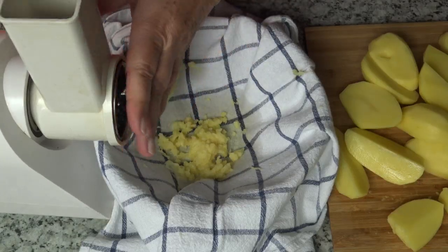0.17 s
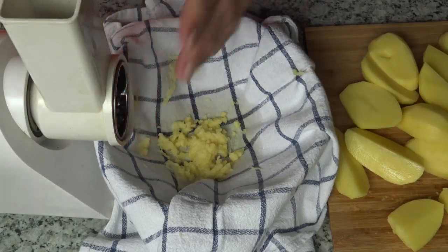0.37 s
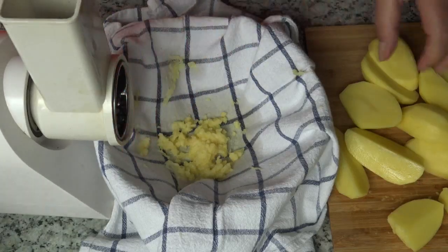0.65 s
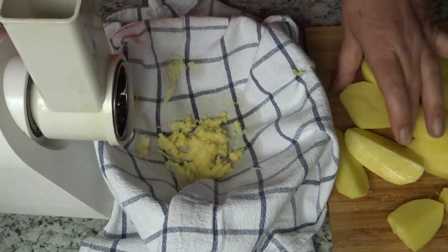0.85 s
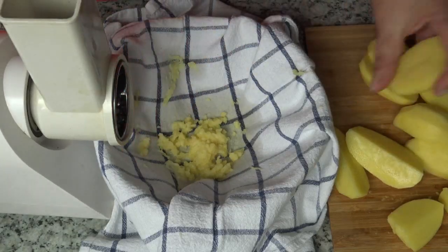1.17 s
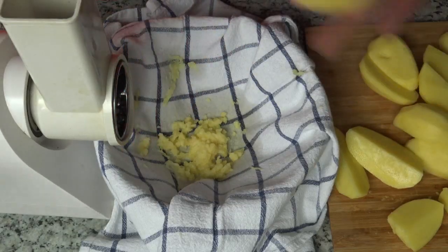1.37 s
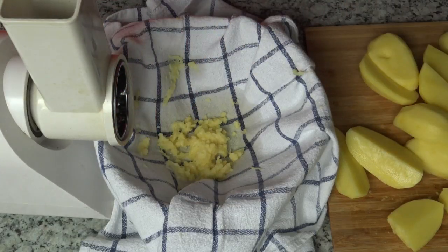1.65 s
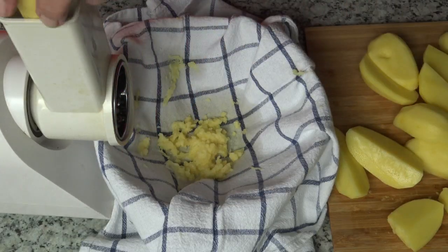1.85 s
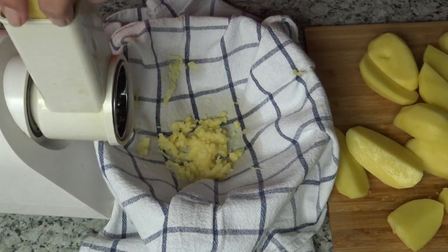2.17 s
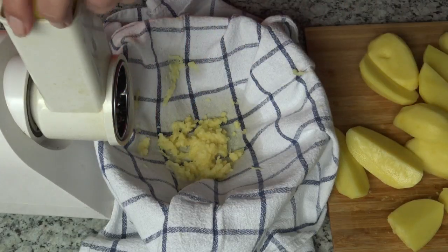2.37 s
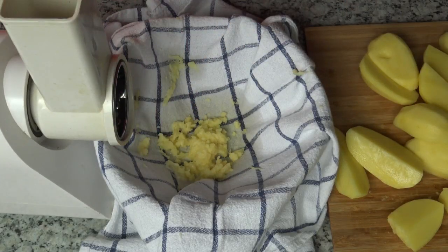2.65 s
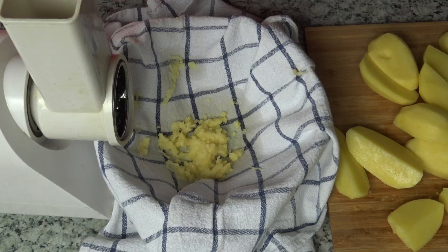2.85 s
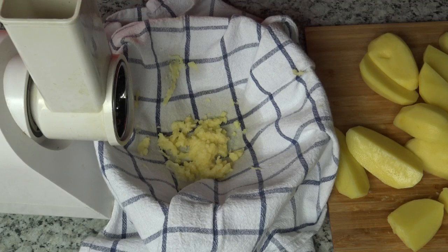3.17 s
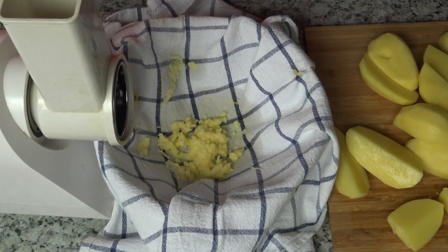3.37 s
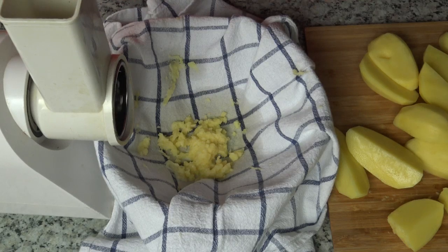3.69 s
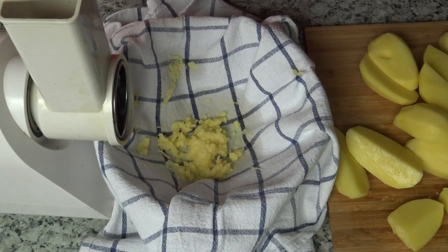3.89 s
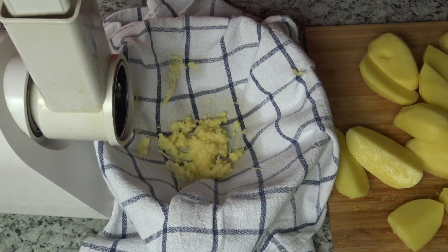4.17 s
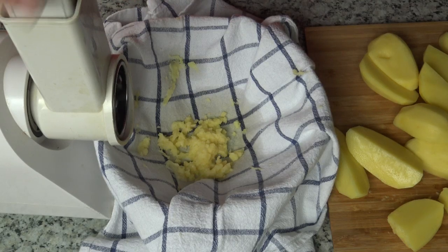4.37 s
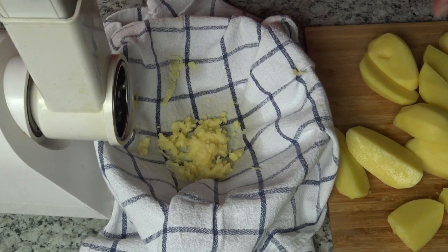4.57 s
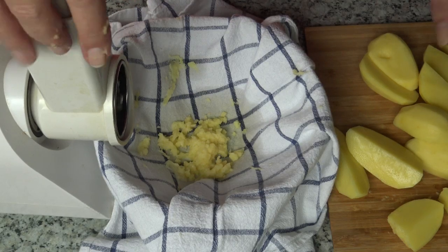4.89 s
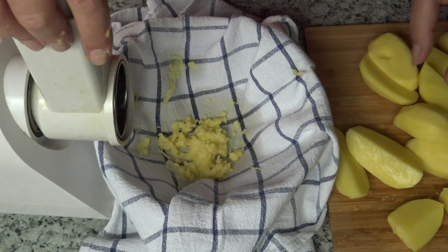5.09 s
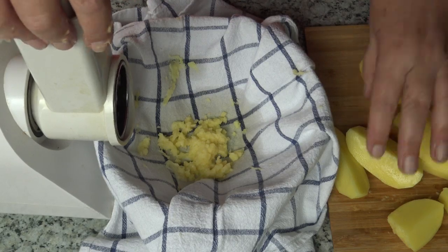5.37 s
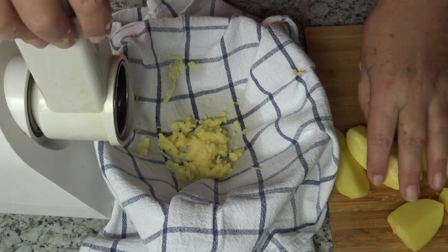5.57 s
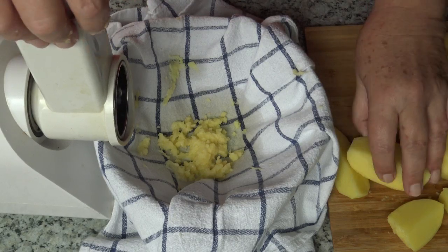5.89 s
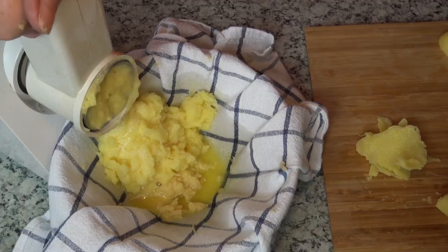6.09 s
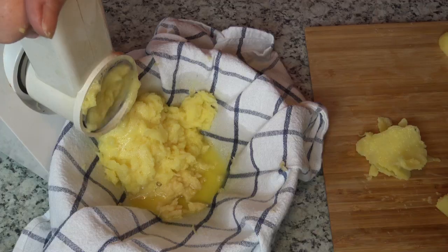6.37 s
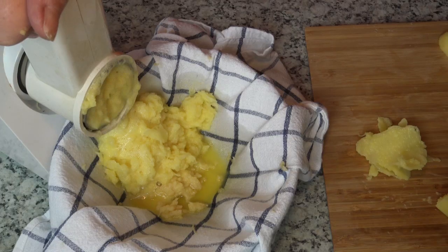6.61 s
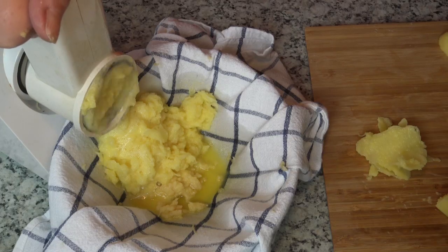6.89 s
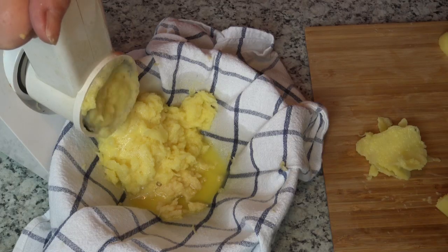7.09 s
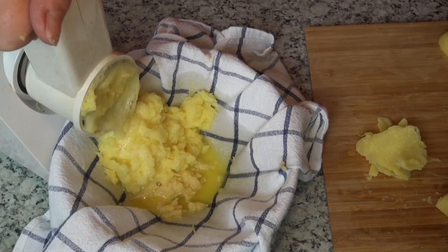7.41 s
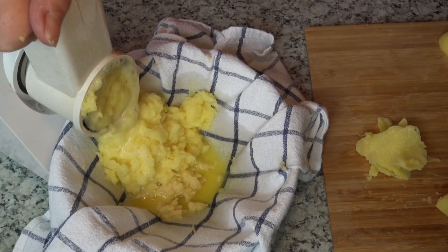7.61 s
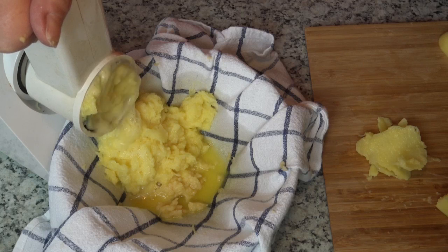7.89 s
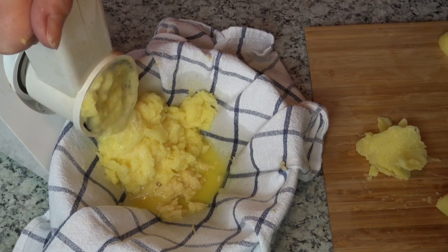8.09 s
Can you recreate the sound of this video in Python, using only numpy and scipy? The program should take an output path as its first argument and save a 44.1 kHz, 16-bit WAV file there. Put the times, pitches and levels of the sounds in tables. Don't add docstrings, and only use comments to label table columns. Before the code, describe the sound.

Handling sounds come first: skin hiss, plastic chatter, sharp knocks on wood and one heavy hollow thud, over faint room hum. Then a crisp switch click starts a loud kitchen motor close to the microphone. It climbs within a second to a buzzing gear whine, squeaks once, rattles and grates steadily, then jumps to a later, faster stretch with slices throbbing in the chute.

```python
import sys
import numpy as np
from scipy import signal
from scipy.fft import rfft, irfft
from scipy.io import wavfile
from scipy.ndimage import uniform_filter1d, map_coordinates

SR = 44100
rng = np.random.default_rng(int(sys.argv[2]) if len(sys.argv) > 2 else 0)


def bounce(signal):
    frames = np.transpose(np.atleast_2d(signal))
    limited = np.clip(frames, -1, 1)
    pcm = np.round(limited * 32767).astype(np.int16)
    wavfile.write(sys.argv[1], SR, pcm)


def voltage_ratio(level):
    return 10 ** (np.asarray(level, float) / 20)


N = 363825
TIME = np.arange(N) / SR
START_S, CUT_S = 3.208, 6.006


def unit(x):
    return x / np.sqrt(np.mean(x ** 2) + 1e-20)


def along(points, hz):
    point_hz, value = np.transpose(points)
    return np.interp(np.log(hz + 1), np.log(point_hz + 1), value)


def curves(rows):
    s, *columns = np.transpose(rows)
    return [np.interp(TIME, s, column) for column in columns]


def wobble(rate):
    coarse = TIME[::32]
    knots = rng.standard_normal(int(N * rate / SR) + 4)
    return np.interp(TIME, coarse, map_coordinates(knots, [coarse * rate]))


def rush(spectrum, patchy_db):
    # pitch_hz, correlation
    likeness = [(60, 0.91), (1400, 0.98), (3000, 0.94), (7000, 0.83), (12000, 0.93)]
    z = signal.stft(rng.standard_normal((2, N + 512)), nperseg=512)[2]
    field = uniform_filter1d(rng.standard_normal(z.shape[1:]), size=4, axis=0)
    field = uniform_filter1d(field, size=10, axis=1)
    pair = signal.istft(z * voltage_ratio(patchy_db * unit(field)), nperseg=512)[1][:, :N]
    hz = np.fft.rfftfreq(N, 1 / SR)
    width = np.arccos(np.clip(along(likeness, hz), -1, 1)) / 2
    mid, side = irfft(rfft(pair) * voltage_ratio(along(spectrum, hz)) * [np.cos(width), np.sin(width)], N)
    return unit(np.array([mid + side, mid - side]))


def sides(x, pan_db):
    lean = np.tanh(np.asarray(pan_db) * np.log(10) / 40)
    return np.array([x * (1 + lean), x * (1 - lean)])


def puff(low_hz, high_hz, t60, rise=0.00052):
    t = np.arange(SR // 4) / SR
    band = signal.butter(N=3, Wn=[low_hz, min(high_hz, SR / 2.1)], btype="band", fs=SR, output="sos")
    noise = unit(signal.sosfilt(band, rng.standard_normal(2 * len(t))))[len(t):]
    return noise * voltage_ratio(-60 * t / t60) * (1 - np.exp(-(t / rise) ** 2))


def room_tone():
    # pitch_hz, level_db per Hz
    spectrum = [(15, -43.5), (25, -16), (53, -2.5), (72, -22.5), (100, 2), (150, -10), (300, -17.5),
                (450, -17), (700, -22), (1500, -23.5), (4000, -32), (15700, -37.5)]
    return voltage_ratio(-51) * rush(spectrum, patchy_db=-0.9)


def kitchen(x):
    # pitch_hz, t60_s
    decay = [(150, 0.45), (1000, 0.27), (4000, 0.29), (12000, 0.13)]
    out, step = np.zeros((2, N + SR)), SR // 4
    for start in range(0, N, step):
        hz, t, z = signal.stft(rng.standard_normal((2, SR // 2)), SR, nperseg=256)
        tail = signal.istft(z * voltage_ratio(-60 * t / along(decay, hz)[:, None]), SR, nperseg=256)[1]
        tail = tail[0] + 0.23 * np.array([tail[1], -tail[1]])
        wet = signal.fftconvolve(x[None, start:start + step], tail / np.linalg.norm(tail[0]), axes=1)
        out[:, start + 200:start + 200 + wet.shape[1]] += wet
    return out[:, :N]


def bumps():
    # start_s, level_db
    jolts = [
        (.03, -39),
        (1.17, -39),
        (1.95, -32.5),
        (4.43, -35),
        (5.95, -33),
        (7.82, -34),
    ]
    out = np.zeros(N + SR)
    for s, db in jolts:
        out[round(s * SR):][:SR // 4] += voltage_ratio(db) * puff(35, 119, 0.27, rise=0.0098)
    return out[:N]


def strokes(column, drop_db_per_s, rest_db):
    # peak_s, build_up_s, hiss_db, body_db
    moves = [(.02, 0.077, -29.5, -28), (0.07, 0.068, -30, -40), (.33, .1, -43.5, -43.5),
             (.6, 0.054, -45, -47), (.8, 0.06, -54, -39.5), (.87, 0.068, -66, -38), (.9, .02, -47.5, -42.5),
             (1.14, 0.0028, -31, -33.5), (1.23, 0.067, -45, -55), (1.59, 0.065, -47.5, -58),
             (1.75, 0.041, -40, -49), (1.96, .12, -50, -47.5), (2.15, 0.14, -65, -45),
             (2.35, .15, -64, -53), (2.5, 0.092, -63, -54), (2.64, .1, -50, -75), (3.2, 0.089, -48, -54)]
    levels = []
    for row in moves:
        before = 11.5 * (row[0] - TIME) / abs(row[1])
        after = drop_db_per_s * (TIME - row[0])
        levels.append(row[column] - np.where(TIME < row[0], before, after))
    return np.maximum(np.max(levels, axis=0), rest_db)


def rustle():
    # pitch_hz, level_db per Hz
    skin = [(1470, -44), (2500, -6), (3220, -0.5), (3590, -1.5), (4250, 0.5), (7160, -3), (10200, -7),
            (15700, -19.5)]
    hiss_db = strokes(2, drop_db_per_s=235, rest_db=-72)
    body_db = strokes(3, drop_db_per_s=150, rest_db=-72)
    body = rush([(350, -40), (650, -3), (1000, -6), (1500, 0), (1800, -5), (2500, -13), (3600, -30)],
                patchy_db=3.5)
    hiss = voltage_ratio(hiss_db - 7.0 + 2.2 * wobble(60)) * rush(skin, patchy_db=2.0)
    return (TIME < START_S) * (hiss + voltage_ratio(body_db - 6.0) * body)


def taps(events, rise, t60):
    out, t = np.zeros(N + SR), np.arange(SR // 4) / SR
    swell = 1 - np.exp(-(t / rise) ** 2)
    for s, db, hz, thud_db, click_db in events:
        tone = np.sin(2 * np.pi * hz * t) * voltage_ratio(-60 * t / t60) * swell
        ring = 0.96 * tone + 0.59 * puff(hz / 1.21, hz * 1.147, t60, rise)
        low = np.sin(2 * np.pi * 270 * t) * voltage_ratio(-42 * t / t60) * swell
        thud = voltage_ratio(thud_db) * (0.67 * puff(165, 336, 1.7 * t60, rise + 0.0017) + 1.02 * low)
        scrape = 0.32 * puff(470, 2700, 1.14 * t60, rise)
        click = voltage_ratio(click_db) * puff(2400, 8750, 0.88 * t60, rise)
        out[round(s * SR):][:len(t)] += voltage_ratio(db) * (ring + thud + scrape + click)
    return out[:N]


def chute_handling():
    # start_s, level_db (peak), pitch_hz (ring), thud_db, click_db
    rubs = [(.102, -29, 720, 8, -20), (.29, -39, 695, -25, -9), (.335, -43, 1790, -14, -8),
            (.582, -40.5, 1860, -34, 3.5), (1.945, -36, 840, 11, -8), (1.99, -43, 870, 3, -9),
            (2.03, -49, 1400, 8, -20), (1.718, -39, 636, -20, -14), (2.14, -41, 900, -3, -18),
            (2.145, -44, 2570, -20, -20)]
    # a fingernail catches on ridges, the board is touched at 0.893 s, the potato lands at 2.497 s
    scuffs = [(.024, -27, 4400, -30, -10), (.036, -24.5, 4500, -30, 0), (.04, -25.5, 1600, -30, -4),
              (.047, -24, 9900, -30, -4), (.062, -23, 10560, -30, -10), (.067, -31, 14000, -30, -7),
              (.07, -22, 4400, -30, -8), (.0765, -24.5, 11000, -30, 1.5), (.078, -30, 14500, -30, -3),
              (.095, -35, 6260, -30, -6), (.893, -44, 2800, -30, -8), (1.338, -46, 2100, -20, 2),
              (2.689, -45, 9500, -30, -2), (2.497, -17.5, 9500, -30, -10), (2.498, -25, 7800, -30, -10)]
    chatter = [(1.8437, -30, 1590, -11, -14), (1.8627, -33, 1300, -12, -10), (1.872, -36, 1500, -14, -10),
               (1.9176, -43, 1590, -14, -15), (1.952, -33, 1000, 9, -5), (2.0967, -36, 1450, -3, -17),
               (2.135, -38, 1510, -6, -14), (2.15, -42, 1510, -12, -16), (2.165, -44, 1500, -6, -18),
               (2.222, -40, 1400, -14, -8), (2.2314, -34, 1360, -9, -10), (2.2393, -34, 1500, -11, -9),
               (2.3366, -45, 1550, -8, -8), (2.3491, -41, 1280, -10, -7), (2.3655, -34, 1480, -10, -14),
               (2.3705, -34, 1500, -10, -13), (2.38, -33, 1550, -2, -11), (2.3895, -32, 1400, -3, -15),
               (2.4, -38, 1490, 2, -14), (2.4269, -42, 1460, -8, -18), (2.4514, -24, 1490, -22, -28),
               (2.4598, -23, 1580, -24, -22), (2.468, -29, 1560, -12, -21), (2.476, -31, 990, 5, -25)]
    small_taps = [(0.0, -26.5, 400, 2.5, -14), (.004, -34, 1400, -7, -11), (0.535, -41, 1970, -13, -13),
                  (0.72, -43, 1990, -15, -7), (1.1355, -29.5, 1255, -13, 0), (1.575, -34.5, 2080, -24, -7),
                  (1.668, -49, 566, -12, -3), (1.71, -34.5, 630, -28, -2.5), (2.516, -24, 3450, 7.5, -16),
                  (2.693, -36.5, 700, 8, -18)]
    cracks = [(0.06, -16.5, 1345, -15, -15), (.063, -18.5, 690, -5, -22), (.0975, -23.5, 1870, -11, -21),
              (.104, -20.5, 332, 3, -26), (.897, -12.5, 890, -8, -31), (1.711, -31, 1830, -30, -20),
              (1.938, -30.5, 1600, 0, -8), (2.047, -35.5, 1490, 4.5, -20), (2.126, -36, 1500, -6, -17),
              (2.546, -21, 1740, 3, -13), (2.56, -26, 950, -6, -9), (2.5756, -21.5, 985, -10, -13),
              (2.577, -24, 1790, -20, -12)]
    rattle = [(4.408, -15, 810, -5, -15), (4.413, -14.5, 1300, -8, -19), (4.416, -19, 1700, -14, -16.5),
              (4.445, -20, 1260, -10, -16), (4.429, -16.5, 1270, -3, -16), (4.487, -11.5, 1240, -0.5, -17),
              (4.492, -17, 860, -10, -17.5), (4.509, -19, 1410, -6, -15), (4.511, -15.5, 1740, -13, -8),
              (4.516, -18, 800, -12, -17), (4.685, -15, 2110, -12, -6)]
    soft = taps(rubs, rise=0.004, t60=0.08) + taps(scuffs, rise=0.0017, t60=0.029)
    soft += taps(chatter, rise=0.0015, t60=0.042) + taps(small_taps, rise=0.001, t60=0.066)
    return soft + taps(list(cracks) + list(rattle), rise=0.00044, t60=0.034)


def switch():
    # start_s, level_db (peak), pitch_hz (ring), thud_db, click_db
    snaps = [
        (3.207, -17, 2680, -34, -10),
        (3.215, -12.5, 2525, -22, 2.5),
        (3.222, -17, 830, -8, -16),
    ]
    return taps(snaps, rise=0.001, t60=0.066)


def blows(events, modes, click_t60, rise):
    out, t = np.zeros(N + SR), np.arange(SR // 4) / SR
    swell = 1 - np.exp(-(t / rise) ** 2)
    for s, db, click_db, dull_db in events:
        ring = 0
        for hz, level_db, t60 in modes:
            decay_db = 60 * (t / t60) ** 1.49
            ring = ring + voltage_ratio(level_db + rng.normal(0, 1) - decay_db) * np.sin(2 * np.pi * hz * t)
        click = voltage_ratio(click_db) * puff(2200, 16000, click_t60, rise=0.00057)
        dull = voltage_ratio(dull_db) * puff(443, 1450, 0.31)
        out[round(s * SR):][:len(t)] += voltage_ratio(db) * (ring * swell + click + dull)
    return out[:N]


def board_knocks():
    # start_s, level_db (peak), click_db, dull_db
    knocks = [
        (.751, -31.5, -35, 5.5),
        (.7575, -6, -29.5, -9),
        (.8955, -15.5, -40, -13),
    ]
    # pitch_hz, level_db, t60_s
    wood = [(130, -18, .2), (190, -18, .15), (310, -18, .12), (556, -16, .1), (684, 0, .14),
            (750, -11, .12), (937, -10, .07), (1200, -15, .12), (1390, -9, .08), (1507, -4, .065),
            (1540, -21, .2), (1900, -25, .04)]
    return blows(knocks, wood, click_t60=0.017, rise=0.002)


def potato_drop():
    # start_s, level_db (peak), click_db, dull_db
    fall = [
        (2.4985, -7, -17, -17),
    ]
    # pitch_hz, level_db, t60_s
    body = [(71, -18, 0.18), (133, -8, 0.14), (292, 5, 0.064), (340, -35, 0.19), (469, -14.5, 0.17),
            (1015, -9, 0.038), (3470, -33, 0.28), (7700, -25, 0.042), (6450, -36, 0.22), (8200, -37, .24),
            (9380, -32, .28), (9720, -30, .06), (12300, -33, .05)]
    return blows(fall, body, click_t60=0.061, rise=0.0039)


def squeak():
    # time_s, pitch_hz, level_db
    slip = [(4.1, 1047, -110), (4.12, 1027, -41), (4.135, 970, -19), (4.16, 630, -27), (4.18, 480, -20),
            (4.21, 423, -31.5), (4.23, 400, -110)]
    hz, db = curves(slip)
    return voltage_ratio(db + 2 * wobble(80)) * np.sin(2 * np.pi * np.cumsum(hz + 15 * wobble(150)) / SR)


def throbs():
    thumps = [(6.064, 0.026, -33, 730), (6.13, 0.06, -18.5, 727), (6.206, 0.021, -21, 719),
              (6.271, 0.05, -21, 718), (6.365, 0.054, -18.5, 750), (6.456, 0.057, -23, 729),
              (6.51, 0.028, -27, 750), (6.562, 0.036, -24, 726), (6.6, 0.041, -29, 743),
              (6.658, 0.021, -26, 724), (6.699, 0.044, -18.5, 740), (6.753, 0.036, -26, 733),
              (6.803, 0.047, -20, 734), (6.891, 0.028, -22.5, 730), (7.013, 0.048, -17, 739),
              (7.08, 0.051, -23.5, 723), (7.177, 0.03, -24, 735), (7.224, 0.039, -30, 710),
              (7.273, 0.022, -24.5, 710), (7.315, 0.03, -21, 710), (7.353, 0.039, -20, 720),
              (7.399, 0.029, -24, 714), (7.45, 0.029, -21, 737), (7.524, 0.038, -22, 730),
              (7.581, 0.049, -19, 722), (7.696, 0.035, -27, 750), (7.743, 0.064, -22.5, 743),
              (7.816, 0.043, -17.5, 742), (7.896, 0.023, -23, 714), (7.934, 0.027, -23, 718),
              (7.997, 0.049, -29, 710), (8.112, 0.04, -21.5, 730), (8.157, 0.035, -22, 718),
              (8.203, 0.043, -24, 736)]
    out, drift = np.zeros(N), 1.24 * wobble(45)
    for s, span, db, hz in thumps:
        near = slice(round((s - .1) * SR), round((s + .1) * SR))
        t = TIME[near] - s
        note = np.sin(2 * np.pi * hz * t + drift[near] + rng.uniform(0, 7.1))
        out[near] += voltage_ratio(db + 0.6) * np.exp(-(1.8 * t / span) ** 2) * note
    return out * voltage_ratio(2.2 * wobble(70))


def shaft_hum(hz, turn, wheel, cutting):
    # pitch_hz, level_db
    answer = [(100, -41.5), (176, -39), (200, -22.5), (248, -12), (272, -10.5), (300, -12), (309, -14),
              (324, -11), (332, -12.5)]
    # pitch_hz, left_right_db
    pan = [(200, 2), (250, 6), (296, 8.5), (309, 5.5), (322, 6.5), (332, 9.5)]
    hum_db = along(answer, hz)
    hum = voltage_ratio(hum_db + 0.77 * wobble(25) + 0.24 * wobble(6.5)) * (1 + 0.021 * wheel) * np.sin(turn)
    hum += voltage_ratio(hum_db - 37.5 + 16.6 * cutting + 1.0 * wobble(20)) * np.sin(.76 * turn)
    return sides(hum, along(pan, hz))


def gear_whine(hz, turn, wheel, cutting, later, teeth_db, hiss_db):
    # multiple, free_db, cutting_db, later_db
    gear = [(2, -49, -39, -34.5), (3, -43, -36, -36), (4, -44.5, -43, -54), (5, -59, -39, -41),
            (6, -51.5, -43, -54), (7, -50, -41, -42.5), (8, -41.5, -34.5, -37), (9, -50, -37, -33.5),
            (10, -35.5, -38.5, -34), (11, -52, -40, -34), (12, -50, -43, -37), (13, -37, -35, -39),
            (14, -45, -59, -42), (15, -47, -37.5, -42), (16, -32.5, -37.5, -41.5), (17, -43, -39.5, -36.5),
            (18, -45, -53, -46), (19, -56, -37.5, -49), (20, -54, -37.5, -34), (21, -52, -54, -38.5),
            (22, -40.5, -40, -39), (23, -53, -39, -52), (24, -41, -42.5, -46.5)]
    # pitch_hz, width_hz, lift_db
    case = [(1400, 120, 4.5), (1733, 116, 15.5), (2160, 78, 7), (2470, 14, 6.5), (2578, 37, 12.5),
            (2686, 69, 12.5), (2775, 26, 7), (2997, 84, 5), (3767, 114, 12.5), (4310, 130, 8),
            (4680, 88, 2), (9820, 340, 8), (11800, 456, 5.5), (13100, 300, 1.5)]
    # start_s (centre), length_s, multiple, level_db (change)
    order_swells = [(4.1, 0.34, 9, 11), (4.4, .2, 10, 3), (4.31, 0.44, 8, -10), (5.38, .3, 15, 5),
                    (4.7, .15, 12, 5), (4.7, .15, 11, 8), (4.9, .2, 15, -6), (3.48, .1, 16, -5), (4.35, .4, 12, 5),
                    (4.68, 0.22, 13, 4), (4.5, .3, 14, 4), (5.65, .4, 8, 3.5), (5.45, 0.049, 8, -3),
                    (7.88, 0.11, 8, -10), (5.1, 0.3, 8, 3), (5.85, 0.27, 16, 8), (5.8, .2, 10, 8),
                    (5.7, .3, 11, 5), (6.1, .15, 19, 7), (7.15, 0.89, 14, 9), (7.24, 0.45, 11, 2.5),
                    (7.05, .4, 9, -6.5), (7.55, .3, 9, 3), (8.1, .4, 9, -1), (8.15, .4, 13, -7),
                    (6.25, 0.49, 13, 2), (8.15, .35, 16, 6), (7.7, 0.42, 6, 16), (7.5, .3, 18, 5),
                    (7.6, .4, 19, 16), (8.8, 0.31, 10, 5), (8.2, .4, 8, 5)]
    grid = np.arange(SR // 2)
    lift_db = sum(db / (1 + (2 * (grid - centre) / width) ** 2) for centre, width, db in case)
    slow_hz = np.clip(245 - hz, 0, None)
    lines = []
    for k, *state_db in gear:
        db = np.interp(cutting + later, range(3), state_db) + teeth_db + lift_db[(k * hz).astype(int)]
        db = db + (0.2 if k == 8 else -0.35) * slow_hz
        for s, span, multiple, swell_db in order_swells:
            if multiple == k:
                db = db + swell_db * np.exp(-(2 * (TIME - s) / span) ** 2)
        lines.append((k, db))
    for k in range(25, 44):
        tick_db = hiss_db - 21.0 - 0.65 * (k - 25) + rng.normal(0, 2.1)
        lines.append((k, tick_db + lift_db[(k * hz).astype(int)]))
    shake = 0.018 * wobble(60) + 0.055 * wobble(15)
    whine = np.zeros((2, N))
    for k, db in lines:
        flutter = voltage_ratio(1.1 * wobble(5) + (3.2 - 2.1 * cutting) * wobble(40))
        flutter = flutter * (1 + (.4 - .2 * cutting) * wheel)
        tone = np.sin(k * (turn + shake) + rng.uniform(0, 7))
        whine += voltage_ratio(db) * flutter * sides(tone, 3 * np.sin((k - 11) / 2))
    return whine


def drum_noise(turn, cutting, later, effort_db, hiss_db):
    # pitch_hz, level_db per Hz
    housing = [(220, -43), (380, -12.5), (479, -6.5), (717, -4), (1380, -4.5), (1520, -2), (1980, -8),
               (2300, -8.5), (2470, -2), (3250, -7.5), (3910, -6), (5470, -17.5), (6000, -6), (7800, -54),
               (13200, -120)]
    housing_later = [(220, -38), (380, -75), (417, -16), (519, -8.5), (603, -14), (725, -5.5), (824, -7.5),
                     (1090, -12.5), (1500, -9), (2070, -16), (2870, -6.5), (3110, -12.5), (6000, -20.5),
                     (7800, -49), (13200, -120)]
    brushes = [(2650, -16.5), (4500, 0.5), (4770, 0.5), (5260, -9), (5960, -1), (6690, 0), (8550, -8.5),
               (9890, -8.5), (12700, -12.5), (15700, -20)]
    worktop = [(25, -54), (60, -30), (100, -19), (140, -6), (165, -16), (210, 1), (250, -1.5), (290, 0.5),
               (370, -2.5), (450, -65)]
    beat = 1 + 0.11 * np.cos(turn)
    first = rush(housing, patchy_db=1.5) * voltage_ratio(1.5)
    second = rush(housing_later, patchy_db=-1.5) * voltage_ratio(2.0)
    roar = voltage_ratio(-23.5 + effort_db) * beat * np.where(later, second, first)
    hiss = voltage_ratio(hiss_db + 1.3 * (1.06 - cutting) * wobble(26.03)) * beat * rush(brushes, patchy_db=2.5)
    rumble = voltage_ratio(-29.5 + 0.55 * cutting + 2.1 * wobble(5)) * rush(worktop, patchy_db=0.0)
    rumble = rumble * sides(np.ones(N), 2.3)
    air = rush([(600, -33.0), (680, -3.0), (738, 5.5), (780, -7.5), (850, -51)], patchy_db=0.5)
    chute = voltage_ratio(np.where(later, -28.5, -33) - 11 * (1 - cutting) + 1.9 * wobble(40)) * air
    return roar + hiss + rumble + chute


def motor():
    # time_s, shaft_hz, effort_db, teeth_db (tooth pressure)
    shaft = [(3.25, 111.9, -1.5, -48), (3.33, 179.8, -1, -1.5), (3.42, 219.5, 2, -1), (3.56, 256.6, 2, 3.5),
             (3.7, 272.8, -2.5, 2), (3.95, 285.9, -2, -0.5), (4.4, 295.5, -2.5, -2), (4.66, 307, -1, -3),
             (4.95, 308.8, -0.5, -0.5), (5.15, 309.1, 0.5, 2), (5.6, 307.9, 2, 1), (6.0, 309.8, 0.5, -1),
             (6.01, 333.1, 1, -1), (6.45, 329.3, -0.5, -1.5), (7.25, 326.8, -0.64, -2.5),
             (7.85, 324.5, -0.9, -1), (7.98, 321.8, -1, -2), (8.25, 321.4, -1.5, -2.5)]
    hz, effort_db, teeth_db = curves(shaft)
    later = TIME > CUT_S
    cutting = np.clip((TIME - 4.35) / 0.26, 0, 1)
    turn = 2 * np.pi * np.cumsum(hz) / SR
    wheel = np.cos(.15 * turn)
    hiss_db = np.where(later, -27.5, -26) + 1.5 * effort_db
    tones = shaft_hum(hz, turn, wheel, cutting)
    tones = tones + gear_whine(hz, turn, wheel, cutting, later, teeth_db, hiss_db)
    noise = drum_noise(turn, cutting, later, effort_db, hiss_db)
    mains_db = np.interp(TIME, [3.22, 3.35, 3.6], [-25, -29, -46])
    mains = voltage_ratio(mains_db + 1.5 * wobble(8)) * np.sin(2 * np.pi * 99.5 * TIME)
    running = np.clip((TIME - START_S) / 0.0071, 0, 1)
    return running * (np.sqrt(2) * tones + noise + mains)


def scene():
    board, drop = board_knocks(), potato_drop()
    small = chute_handling() + switch()
    hits = sides(board, 1.2) + sides(drop, 3.5) + sides(small, .8)
    hits = hits + voltage_ratio(-12) * kitchen(board / 9 + drop + small)
    return room_tone() + bumps() + rustle() + hits + squeak() + sides(throbs(), 1.9) + motor()


def band_limit(x):
    return signal.sosfilt(signal.butter(12, 15810, fs=SR, output="sos"), x)


def record(dry):
    fade_s = 0.031
    faded = dry * np.clip(abs(TIME - CUT_S) / fade_s, .03, 1)
    held = faded / (1 + abs(faded / .97) ** 8) ** (1 / 8)
    return band_limit(held)


dry = scene()
out = record(dry)
bounce(out)
```